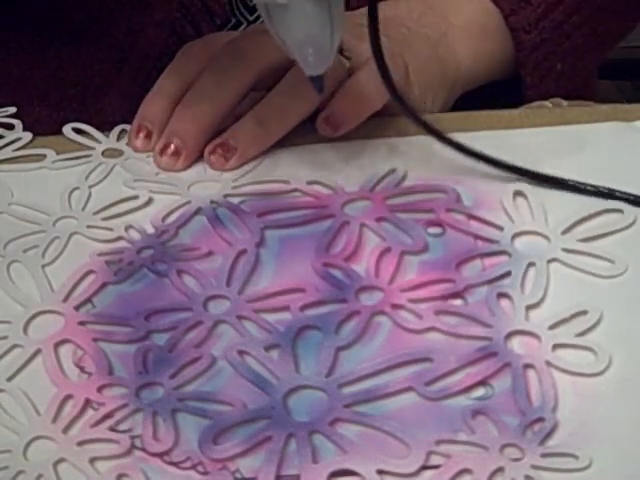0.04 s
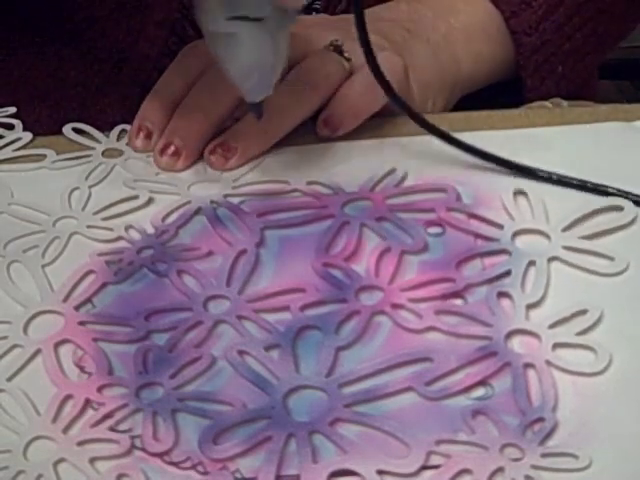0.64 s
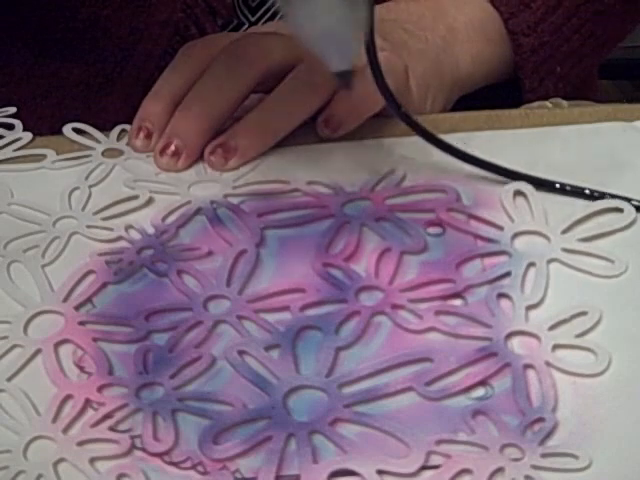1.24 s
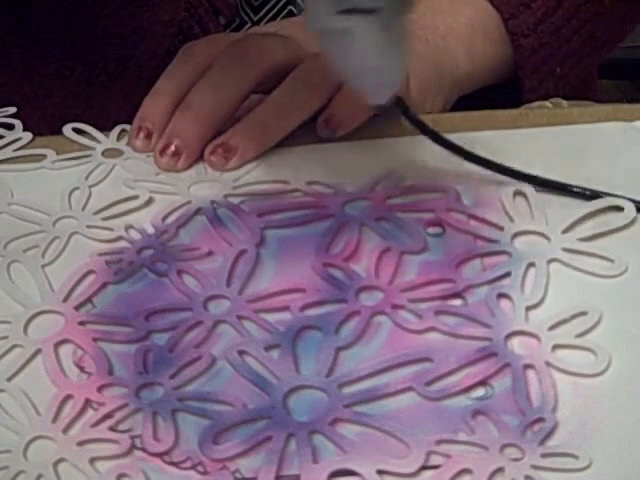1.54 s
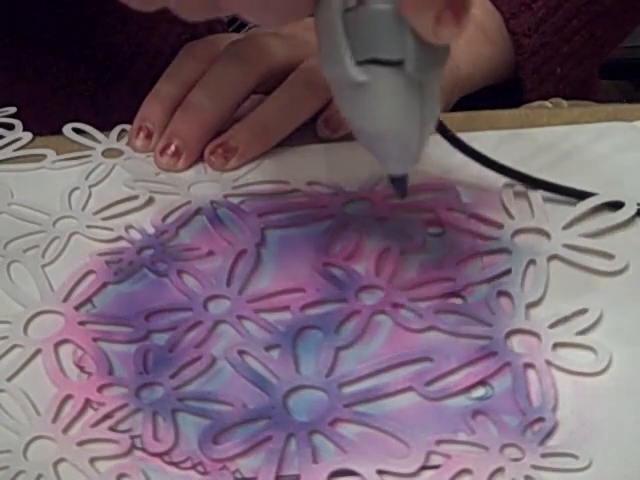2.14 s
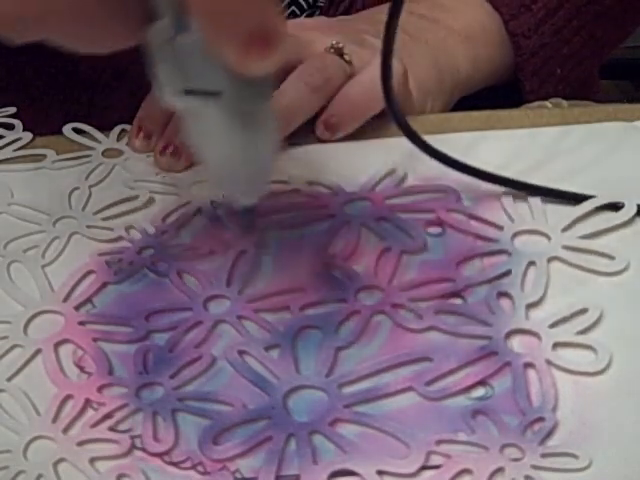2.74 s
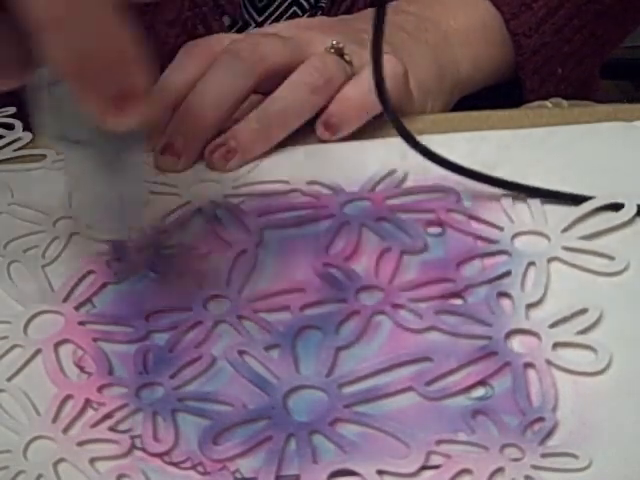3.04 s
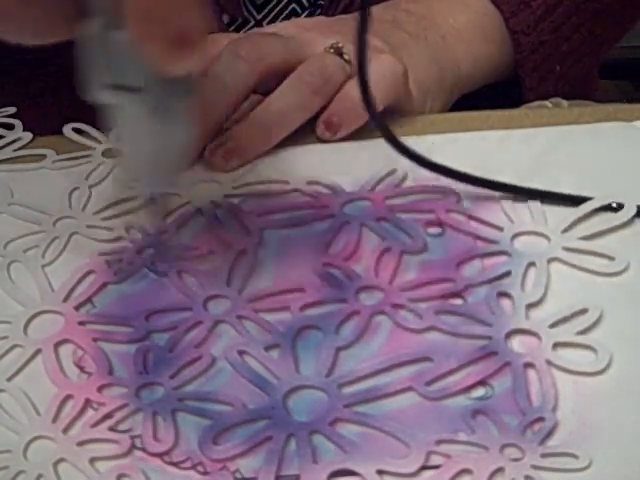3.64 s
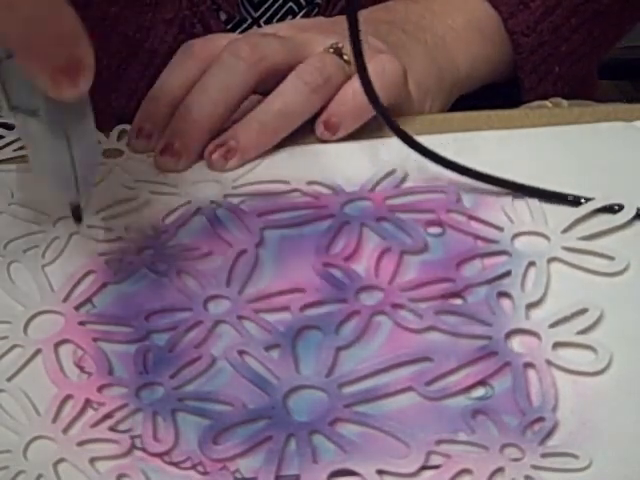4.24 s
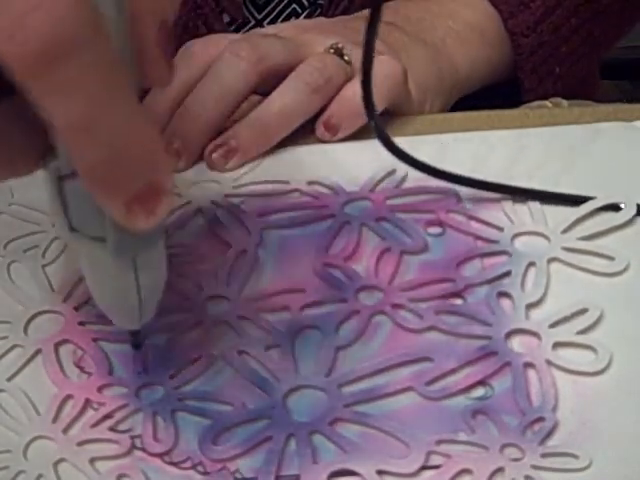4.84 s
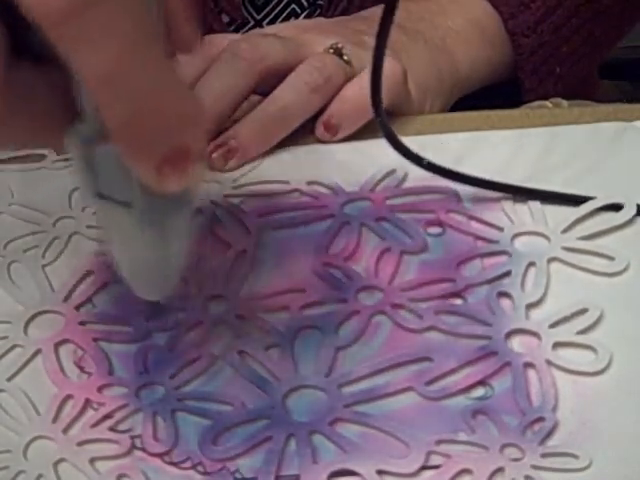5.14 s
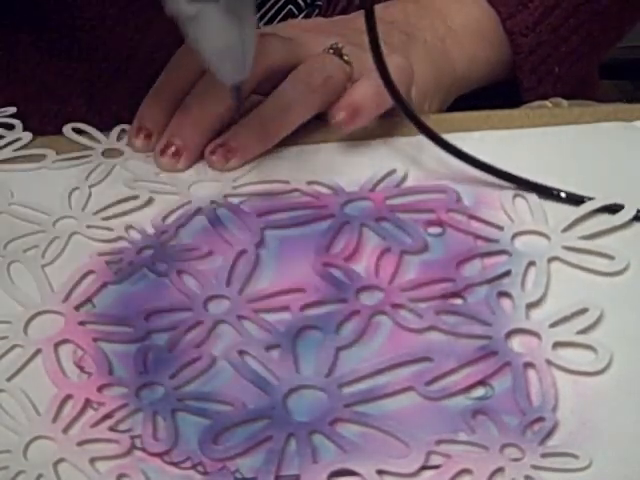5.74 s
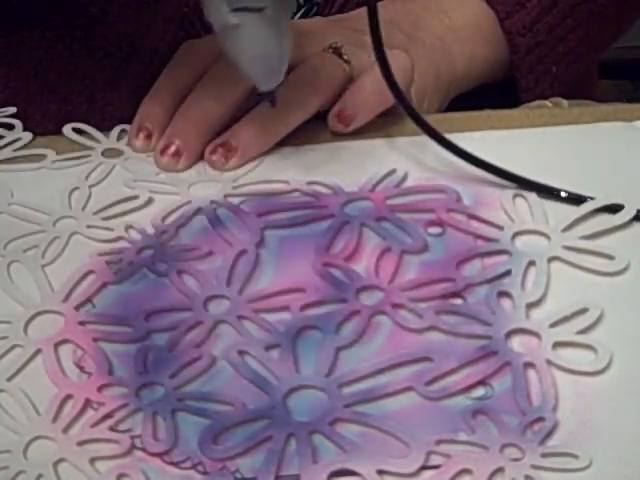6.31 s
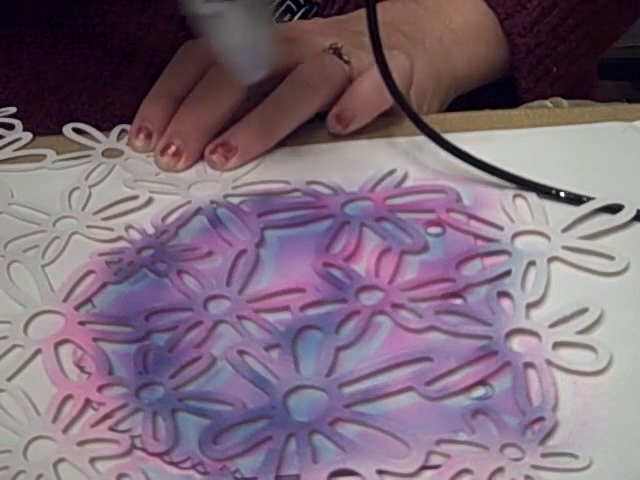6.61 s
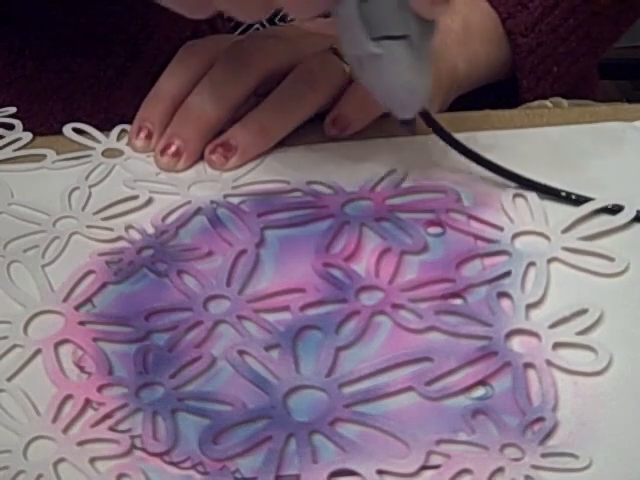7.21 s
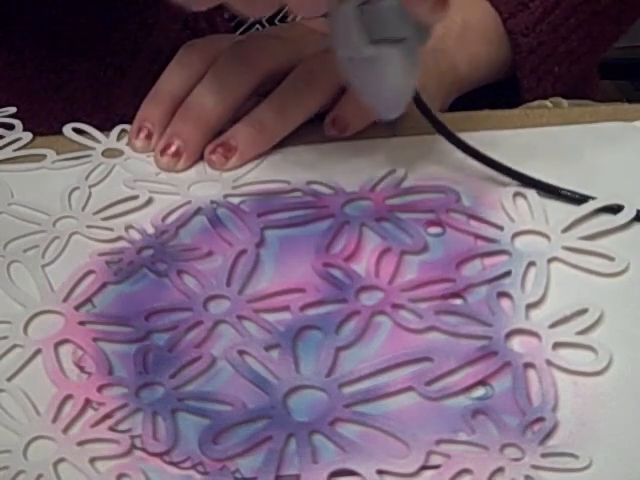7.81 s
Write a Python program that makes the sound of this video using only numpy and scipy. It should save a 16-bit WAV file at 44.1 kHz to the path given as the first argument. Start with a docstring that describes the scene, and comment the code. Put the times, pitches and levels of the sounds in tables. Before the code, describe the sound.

A small airbrush sprays ink through a plastic stencil onto paper, close to the microphone in a quiet room. Its bright hiss runs without a break, shifting slightly in tone over a softer rush of air on the sheet. A rough flare comes near the start, light puffs follow, and a cluster of flares comes near the end as the jet catches fingers. Very faint low bumps come and go.

```python
"""Airbrush through a stencil

A small airbrush sprays ink through a plastic stencil on paper, close up in a quiet room.
The nozzle hisses and its jet washes over the sheet; both change as the hand sweeps about.
Stencil edges and fingers in the jet shed eddies that flare into a rougher, lower rush.
Faint low bumps come and go."""
import sys
import numpy as np
from scipy import signal
from scipy.fft import rfft, irfft, next_fast_len
from scipy.io import wavfile
from scipy.ndimage import uniform_filter1d, map_coordinates

SR = 44100
rng = np.random.default_rng(int(sys.argv[2]) if len(sys.argv) > 2 else 0)


def inscribe(sig):
    """Save sig as 16-bit PCM at rate SR to the path in sys.argv[1].

    A 1-D sig is mono; a 2-D sig holds one channel per row.
    Samples are clipped to [-1, 1] before scaling.
    """
    pcm = np.round(np.clip(np.atleast_2d(sig).T, -1, 1) * 32767)
    wavfile.write(sys.argv[1], SR, pcm.astype(np.int16))


N = 347067
TIME_S = np.arange(N) / SR
FREQ_HZ = np.fft.rfftfreq(N, 1 / SR)


def amp(db):
    """Decibels to gain."""
    return 10 ** (np.asarray(db) / 20)


def unit_rms(x):
    """Scale to rms 1."""
    return x / np.sqrt(np.mean(x ** 2) + 1e-20)


def curves(rows, time_s):
    """Each column after the first, interpolated at time_s."""
    knots_s, *columns = np.transpose(rows)
    return [np.interp(time_s, knots_s, column) for column in columns]


def colour(points):
    """Gain per frequency from (freq_hz, gain_db) points on a log axis."""
    freq_hz, gain_db = np.transpose(points)
    return amp(np.interp(np.log(FREQ_HZ + 1), np.log(freq_hz), gain_db))


def bell(x, centre, half_width):
    """Gaussian of height 1, down to 1/e at half_width."""
    return np.exp(-((x - centre) / half_width) ** 2)


def peaks(rows):
    """Gain per frequency of broad resonances and dips."""
    return amp(sum(db * bell(FREQ_HZ, hz, width_hz / 2) for hz, width_hz, db in rows))


def rolloff(ratio, order):
    """Butterworth skirt, falling once ratio passes 1."""
    return 1 / np.sqrt(1 + ratio ** (2 * order))


def low_cut(corner_hz):
    """Gain per frequency of a high-pass."""
    return rolloff(corner_hz / (FREQ_HZ + 1), order=4)


def noise(gain):
    """Noise of rms 1, shaped by a gain per frequency."""
    size = next_fast_len(N)
    shape = np.interp(np.fft.rfftfreq(size, 1 / SR), FREQ_HZ, gain)
    spectrum = rfft(rng.standard_normal(size)) * shape
    return unit_rms(irfft(spectrum, size)[:N])


def wobble(rate_hz):
    """Smooth random curve, rate_hz knots a second."""
    knots = rng.standard_normal(int(N * rate_hz / SR) + 4)
    return map_coordinates(knots, [TIME_S * rate_hz])


def steer(x, change_db, turbulence_db, frame_samples=512):
    """Recolour x by change_db(freq_hz, time_s), with drifting patches from turbulence."""
    freq_hz, time_s, spectra = signal.stft(x, SR, nperseg=frame_samples)
    patches = uniform_filter1d(rng.standard_normal(spectra.shape), size=7, axis=0)
    patches = unit_rms(uniform_filter1d(patches, size=30, axis=1))
    gain_db = change_db(np.maximum(freq_hz, 100)[:, None], time_s) + turbulence_db * patches
    return signal.istft(spectra * amp(gain_db), SR, nperseg=frame_samples)[1][:N]


# Free jet spectrum: freq_hz, gain_db
HISS_SPECTRUM = [(200, -31.5), (1000, -29), (3000, -14), (4500, -9.5), (5800, -7), (7000, -3.5),
                 (8500, -0.5), (10200, 2), (11600, -0.5), (12400, -0.9)]
# Hiss and its treble lobe as the aim changes: time_s, hiss_db, lobe_db
HISS_AIM = [(0.0, -46, -0.2), (0.56, -47.5, 4), (0.79, -44.5, 0), (0.87, -48.5, 5), (1.11, -46.5, -3.4),
            (1.99, -48, -0.5), (3.02, -45, -4), (3.26, -49.5, 5.5), (3.66, -47, -2), (3.9, -49.1, 2),
            (4.21, -49.1, -5.5), (4.45, -47.5, 4.5), (5.01, -45.5, 0.2), (5.88, -49.2, 1.5),
            (5.96, -47, -2), (6.28, -48.5, -2.5), (7.08, -49, 0), (7.15, -47.8, -6), (7.71, -47, -2.5),
            (7.87, -47.5, -9)]
# Resonance drifting with the hand's pose: time_s, centre_hz, gain_db
HISS_RESONANCE = [(0, 5300, 4), (1.4, 5150, 5), (3.2, 5700, 2), (6.3, 5750, -3.5), (7.87, 5850, 8)]


def nozzle_hiss(gain_db=2.5, lobe_hz=7000, lobe_half_octaves=0.28, ring_half_width_hz=420):
    """Free jet noise; its colour turns with the aim of the brush."""
    def aim_db(freq_hz, time_s):
        hiss_db, lobe_db = curves(HISS_AIM, time_s)
        ring_hz, ring_db = curves(HISS_RESONANCE, time_s)
        lobe = bell(np.log2(freq_hz / lobe_hz), 0, lobe_half_octaves)
        ring = bell(freq_hz, ring_hz, ring_half_width_hz)
        return hiss_db + lobe_db * lobe + ring_db * ring
    jet = noise(colour(HISS_SPECTRUM) * low_cut(110))
    flutter_db = 0.3 * wobble(rate_hz=45)  # uneven ink feed
    return amp(gain_db + flutter_db) * steer(jet, aim_db, turbulence_db=1.23)


# Spectrum of the flow over the sheet: freq_hz, gain_db
WASH_SPECTRUM = [(200.0, -10.5), (500.0, -8), (900.0, -4), (1500.0, -2), (2500.0, -0.13), (3300.0, 0),
                 (4500.0, -0.8), (6000.0, 1), (9000.0, -7.5), (12500.0, -17)]
# Its peak and dip: centre_hz, width_hz, gain_db
WASH_PEAKS = [(2460, 420, 0.9), (3360, 500, -1)]
# Strength of the jet on the sheet: time_s, level_db
WASH_STRENGTH = [(0, -53.5), (0.95, -54.5), (1.75, -51.5), (2.78, -55), (3.35, -54.5), (3.5, -55),
                 (4.25, -55.5), (4.65, -53.5), (4.9, -50.5), (5.05, -53), (5.27, -52.5), (5.7, -55.5),
                 (5.93, -57), (6.08, -53), (6.66, -56), (6.82, -58.5), (7.15, -55.5), (7.7, -49.5),
                 (7.87, -54.5)]


def sheet_wash(gain_db=0.47, usual_db=-54, pivot_hz=2000, tilt_per_db=0.13):
    """The jet spreads over the sheet: a softer, lower rush that dulls as it weakens."""
    def spread_db(freq_hz, time_s):
        wash_db, = curves(WASH_STRENGTH, time_s)
        tilt_db_per_octave = -0.5 + tilt_per_db * (wash_db - usual_db)
        return wash_db + tilt_db_per_octave * np.log2(freq_hz / pivot_hz)
    flow = noise(colour(WASH_SPECTRUM) * peaks(WASH_PEAKS) * low_cut(120))
    ruffle_db = 0.61 * wobble(rate_hz=22)  # the stencil's cut-outs ruffle the flow
    return amp(gain_db + ruffle_db) * steer(flow, spread_db, turbulence_db=1.16)


# Room air spectrum: freq_hz, gain_db
ROOM_SPECTRUM = [(20, -7), (70, -17), (95, 5), (125, 3), (170, -14.5), (330, -4), (700, -14), (2000, -33)]


def room_murmur(level_db=-82, waver_db=2):
    """Faint, wavering murmur of the room's air."""
    return amp(level_db + waver_db * wobble(rate_hz=9)) * noise(colour(ROOM_SPECTRUM))


# Strongest bumps: centre_s, half_length_s, level_db
LOW_BUMPS = [(.077, .03, -70), (0.628, .03, -70), (1.1, .03, -72), (3.017, 0.041, -69), (4.48, .1, -69),
             (4.818, .037, -69), (5.937, 0.056, -72), (6.75, 0.095, -69), (7.345, .12, -63.5),
             (7.647, .035, -60)]
# Bump spectrum: freq_hz, gain_db
BUMP_SPECTRUM = [(15, 2), (30, -2.5), (60, -14), (100, -16), (250, -26), (1000, -80)]


def low_bumps(stir_db=-90, swing_db=5):
    """Soft thumps, as of arms and hose moving on the table, over weaker random stirring."""
    stirring = amp(stir_db + swing_db * wobble(rate_hz=9))
    thumps = sum(amp(db) * bell(TIME_S, centre_s, half_s) for centre_s, half_s, db in LOW_BUMPS)
    return (stirring + thumps) * noise(colour(BUMP_SPECTRUM))


def flare(centre_s, half_length_s, low_hz, top_hz, resonance=1):
    """An obstacle in the jet sheds eddies: band noise whose power swells and falls once."""
    eddies = noise(resonance * low_cut(low_hz) * rolloff(FREQ_HZ / top_hz, order=2))
    return np.sqrt(bell(TIME_S, centre_s, half_length_s)) * eddies


# Jet crossing a stencil edge: centre_s, level_db, top_hz
EDGE_CROSSINGS = [(.434, -58, 2400), (1.425, -57, 1900), (2.064, -51.5, 1980), (2.25, -58, 1900),
                  (4.015, -56, 5200), (4.236, -54, 5200), (4.666, -55, 6400), (4.91, -53, 7300),
                  (5.519, -54, 5800), (5.81, -55.5, 4400), (7.25, -56, 2300)]


def edge_puffs(half_length_s=0.029, band_octaves=1.5, rough_db=2):
    """Light puffs of eddies off the stencil's edges."""
    puffs = sum(amp(level_db) * flare(centre_s, half_length_s, top_hz / 2 ** band_octaves, top_hz)
                for centre_s, level_db, top_hz in EDGE_CROSSINGS)
    return puffs * amp(rough_db * wobble(rate_hz=120))


# Jet striking the fingers on the stencil: centre_s, half_length_s, level_db, top_hz
FINGER_STRIKES = [(0.712, .037, -43, 3100), (.796, 0.019, -51, 3900), (6.122, 0.093, -52, 4940),
                  (6.248, 0.054, -48, 4600), (6.43, 0.097, -50, 4900), (6.581, 0.051, -47, 4400),
                  (7.045, 0.027, -48.5, 4170), (7.112, 0.022, -48.5, 4430), (7.506, .02, -49.5, 4400),
                  (7.615, 0.034, -37.5, 10400), (7.649, .013, -37.8, 7500)]
# Air pocket peaks and dips: centre_hz, width_hz, gain_db
POCKET_PEAKS = [(1750, 400, 1.5), (3030, 1300, -1.5), (4040, 1600, 3.5), (5840, 3900, -1)]


def finger_flares(base_low_hz=1200, base_top_hz=4500, low_tracking=0.43, rough_db=0.68):
    """Loud, rough flares, made hollow by the air pocket between the fingers."""
    pocket = peaks(POCKET_PEAKS)
    flares = np.zeros(N)
    for centre_s, half_length_s, level_db, top_hz in FINGER_STRIKES:
        low_hz = base_low_hz * (top_hz / base_top_hz) ** low_tracking
        flares += amp(level_db) * flare(centre_s, half_length_s, low_hz, top_hz, pocket)
    return flares * amp(rough_db * wobble(rate_hz=120))


def scene():
    """Mono mix on both channels."""
    mono = nozzle_hiss() + sheet_wash() + room_murmur() + low_bumps() + edge_puffs() + finger_flares()
    return np.array([mono, mono])


def record(dry, cutoff_hz=12580, offset_db=-66):
    """Brick-wall low-pass and a slight negative DC offset."""
    return irfft(rfft(dry) * (FREQ_HZ < cutoff_hz), N) - amp(offset_db)


dry = scene()
out = record(dry)
inscribe(out)
```